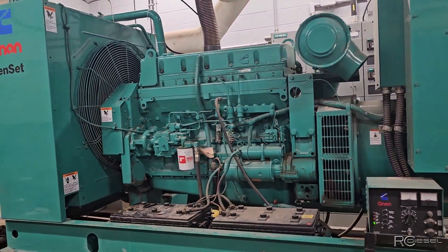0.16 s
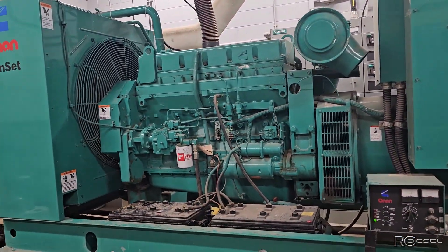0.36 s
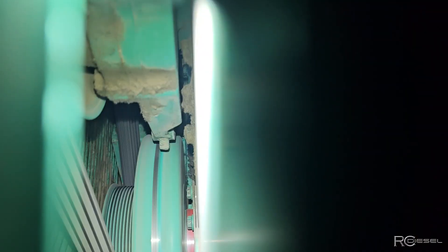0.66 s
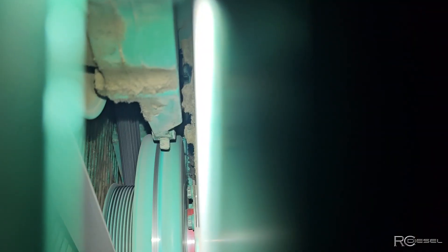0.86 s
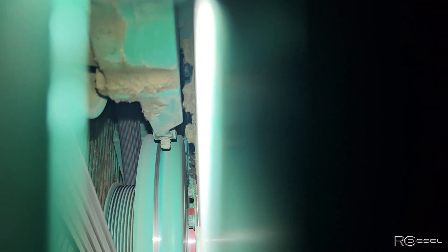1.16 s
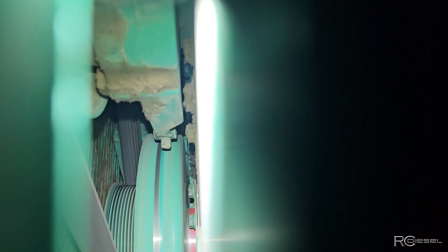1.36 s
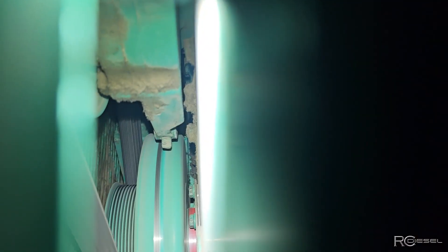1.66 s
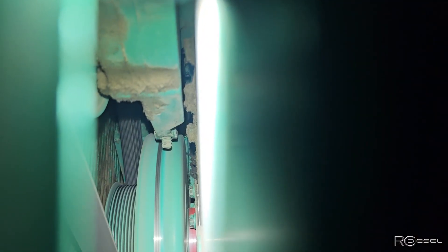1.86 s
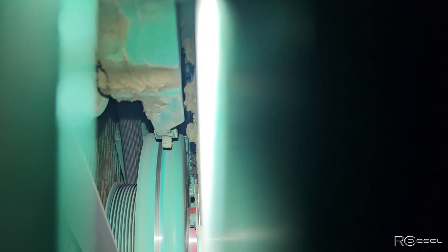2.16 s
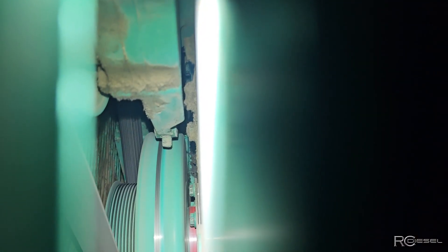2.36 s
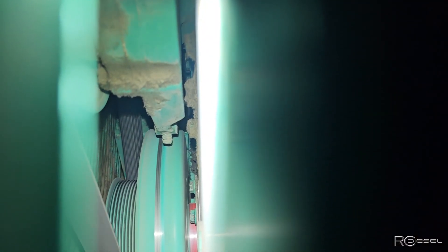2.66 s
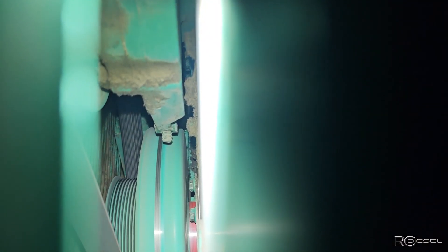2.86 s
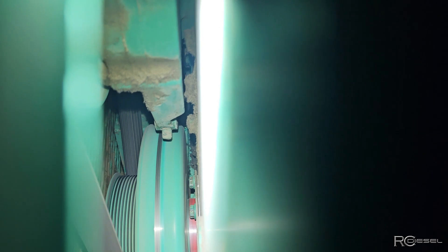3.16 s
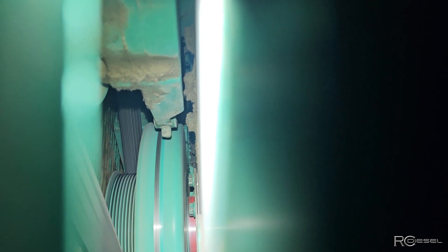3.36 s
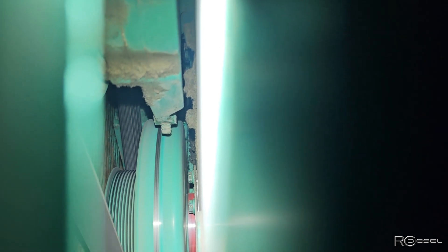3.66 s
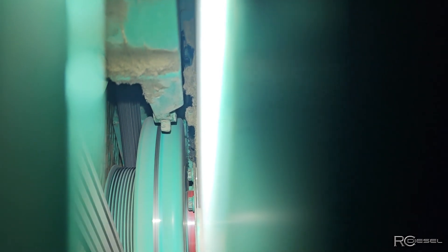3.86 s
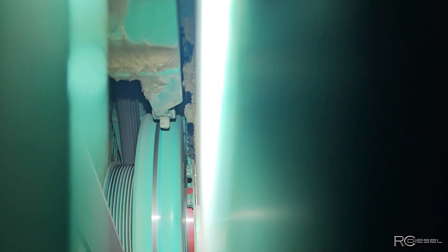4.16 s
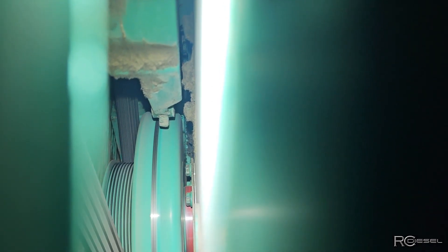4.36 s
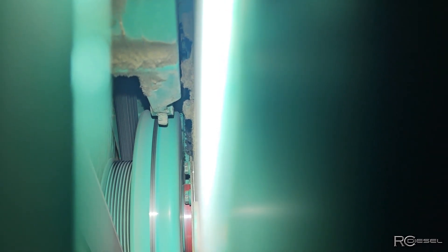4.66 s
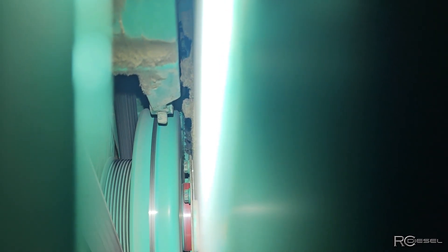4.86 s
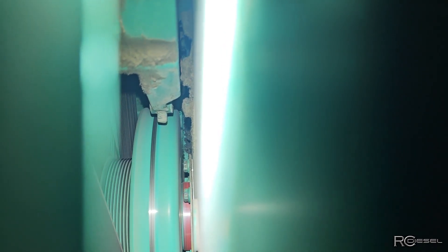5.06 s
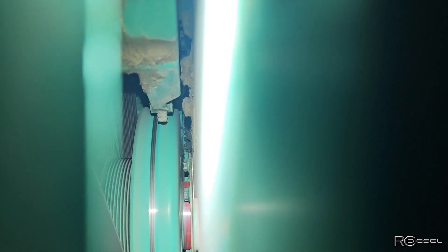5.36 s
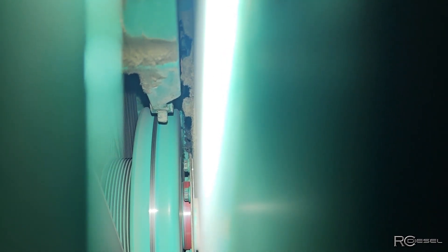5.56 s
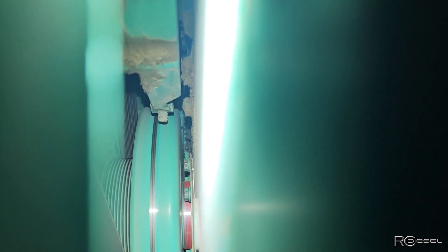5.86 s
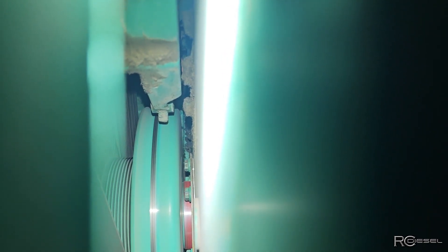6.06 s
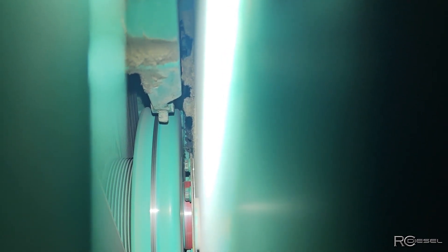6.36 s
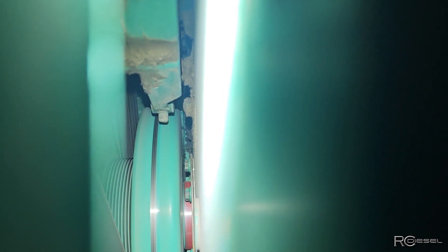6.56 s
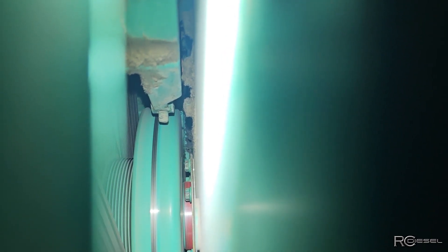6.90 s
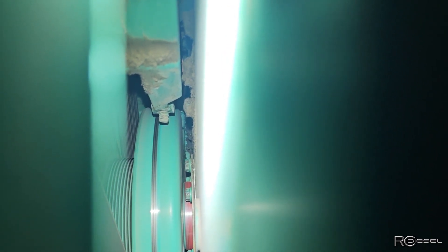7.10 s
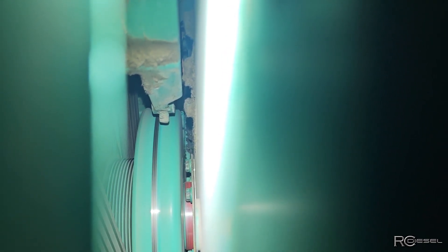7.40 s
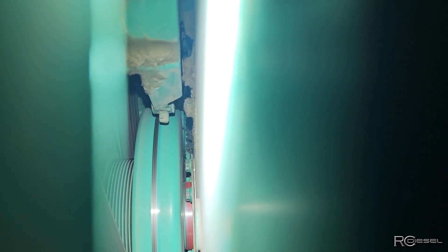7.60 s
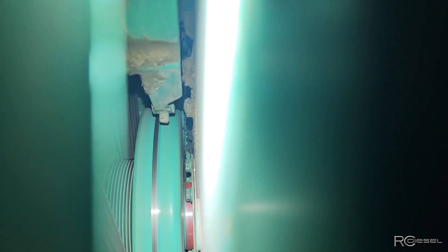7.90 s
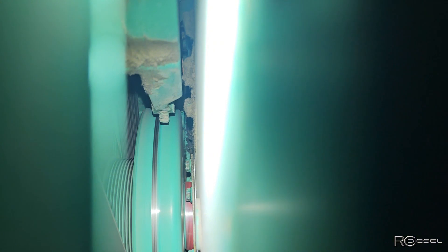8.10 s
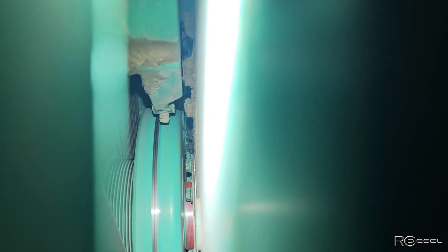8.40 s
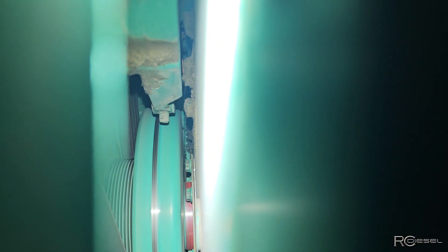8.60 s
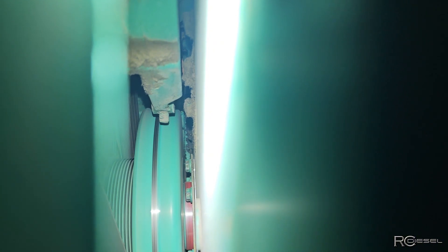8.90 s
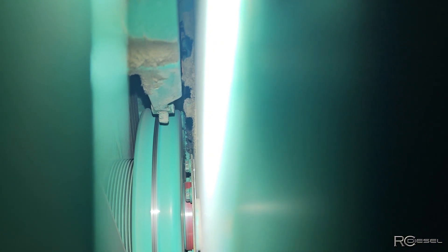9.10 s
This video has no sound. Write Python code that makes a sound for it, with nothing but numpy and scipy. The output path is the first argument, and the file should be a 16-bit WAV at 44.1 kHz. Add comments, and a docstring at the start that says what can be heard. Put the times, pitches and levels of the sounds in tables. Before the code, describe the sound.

Short distant diesel engine drone dips out, then abruptly a strong low fan-blade hum with steady windy roar and hiss, faint knocking beneath.

```python
"""A six-cylinder diesel generator runs at a steady speed in a workshop, first heard from across the room:
steady engine tones lead, over a wash of firing knocks. That view fades out; after a short silence
the microphone is right beside the radiator fan. Its blades give a strong hum with fluttering overtones,
shaped noise makes the rushing air, and engine tones and ringing knocks drone and clatter underneath."""
import sys
import numpy as np
from scipy import signal
from scipy.fft import rfft, irfft
from scipy.io import wavfile
from scipy.ndimage import uniform_filter1d

SR = 44100
rng = np.random.default_rng(int(sys.argv[2]) if len(sys.argv) > 2 else 0)


def waveform_to_disk(signal):
    """Save audio, clipped to [-1, 1], as 16-bit WAV at the path in sys.argv[1]."""
    frames = np.transpose(np.atleast_2d(signal))
    scaled = np.clip(frames, -1, 1) * 32767
    samples = np.round(scaled).astype(np.int16)
    wavfile.write(sys.argv[1], SR, samples)


N = 407484
T, HZ = np.arange(N) / SR, np.fft.rfftfreq(N, 1 / SR)

CYCLE_HZ, BLADE_HZ = 15.0, 179.52  # full four-stroke cycles and passing fan blades per second
FAR_DB, FADE_START_S, FADE_END_S, FADE_EXPONENT = -15.5, 0.11, 0.44, 1.03  # the view across the room
CUT_IN_S = 0.5565  # the view beside the fan is at full level from here
SECOND_DB, SECOND_DRIFT_DB = -27, 4  # second blade tone: level against the hum, rms of its chance drift
DRAUGHT_DB, DRAUGHT_FOLLOW = -42.5, 2.2  # wind: level at median airflow, dB gained per dB of hiss
BAND_EDGE_HZ = 15880

# knock strength of each cylinder in firing order, relative: (level [dB])
CYLINDER_KNOCKS = [2, 4.5, 2, 2.5, 4.5, 5.5]
# engine tones across the room, before the mix: (multiple of the four-stroke cycle, level [dB])
FAR_ENGINE_TONES = [(6, -14), (9, -6.5), (11, -13.5), (12, -6), (16, -8.5), (18, -18), (24, -10), (26, -19),
                    (34, -21.5), (36, -15.5), (52, -22), (80, -21.5), (123, -23)]
# colour of the knocks and wash in the room: (frequency [Hz], relative level [dB per Hz])
ROOM_COLOUR = [(20, -28), (60, -12), (130, -1), (220, -4.5), (330, -9), (480, -14.5), (750, -10),
               (1000, -15), (1400, -12.5), (2500, -22), (4000, -22), (6300, -23.5), (10000, -25),
               (11500, -25), (15700, -28)]
# likeness of the two ports across the room, held within -1 to 1: (frequency [Hz], likeness)
FAR_LIKENESS = [(130, 2.5), (290, 0.5), (640, 0.7), (1400, 0)]
# balance of the ports across the room: (frequency [Hz], left minus right [dB])
FAR_BALANCE = [(200, 2.4), (1200, .5), (4400, 1.8), (15000, 2.6)]

# blade hum beside the fan, before trim and dips: (time [s], level [dB])
HUM_LEVEL = [(0.56, -31.5), (0.73, -24), (1.14, -18), (1.89, -18.5), (2.03, -16), (2.42, -17), (3.58, -17),
             (3.97, -18), (4.81, -15.5), (5.39, -17), (6.82, -17), (6.99, -19.5), (7.16, -17.5),
             (7.84, -19), (9.07, -16.5), (9.24, -22)]
# brief dips of the hum: (middle [s], half length [s], depth [dB])
HUM_DIPS = [(3.75, .025, 2), (4.475, .018, 5.5), (5.44, .03, 5), (8.27, .04, 4)]
# swells of the second blade tone: (middle [s], half length [s], lift [dB])
SECOND_SWELLS = [(1.87, 0.15, 9), (4.25, 0.35, 11), (5.15, .35, 6.5)]
# third blade tone, before trim: (time [s], level [dB])
THIRD_LEVEL = [(0.56, -44.3), (0.81, -32.5), (1.06, -43), (1.31, -28), (1.94, -28), (2.57, -38.5),
               (2.7, -27), (2.95, -34.5), (3.96, -27.5), (4.59, -33), (4.84, -28.5), (5.97, -43),
               (6.22, -33), (6.85, -32), (7.23, -46), (7.35, -30.5), (8.74, -33), (9.24, -34.5)]
# higher blade tones at median hum: (multiple of the blade rate, level [dB], lead of left [rad])
BUZZ_TONES = [(4, -36.5, 1.1), (5, -39, 2), (6, -48, 7), (7, -36, 4), (8, -42, -2), (9, -45, -1),
              (10, -41, 2), (12, -48, -1.5)]
# air stream as the microphone moves into it, before trim: (time [s], roar level [dB], hiss level [dB])
AIR_LEVELS = [(0.56, -26.5, -28.5), (0.6, -24, -28), (0.68, -30, -30.3), (0.8, -27, -30),
              (0.92, -27.5, -26.3), (1.2, -23.5, -23.2), (1.5, -25, -24.5), (1.68, -22.5, -23),
              (2.0, -25, -23), (2.8, -23.0, -23), (3.6, -24.5, -22), (4.2, -22.0, -21.6), (4.8, -23.5, -22),
              (5.6, -20.5, -22), (6.7, -21, -21.5), (7.0, -19.5, -22), (8.4, -18.5, -21), (9.24, -21, -21)]
# colour of the low air roar: (frequency [Hz], relative level [dB per Hz])
ROAR_COLOUR = [(15, -40), (50, -17), (110, -7.5), (165, 3), (200, 0), (245, -4.5), (300, -4), (430, -7.5),
               (520, -2.5), (680, -2), (980, -4), (1280, -0.5), (1800, -10), (4000, -23)]
# colour of the high air hiss: (frequency [Hz], relative level [dB per Hz])
HISS_COLOUR = [(300, -16), (1200, -4), (2100, -1.5), (3200, 1.5), (5000, 0), (5850, -3.5), (6400, 3),
               (7600, 0.5), (8500, -3), (9700, -6), (10150, -10), (11300, -1), (13000, -4), (15700, -5)]
# colour of the wind on the microphone: (frequency [Hz], relative level [dB per Hz])
DRAUGHT_COLOUR = [(12, -35), (30, -14), (60, -3), (90, 2.0), (140, -5), (400, -52), (1500, -90)]
# engine tones beside the fan at median airflow: (multiple of the four-stroke cycle, level [dB])
NEAR_ENGINE_TONES = [(4, -67), (6, -55), (9, -41), (11, -42), (14, -53), (16, -49.5), (18, -50.5),
                     (26, -44.5), (40, -42.5), (52, -42.5), (58, -63), (64, -54), (70, -37), (75, -48),
                     (78, -52), (80, -54), (92, -54)]
# colour of the engine clatter: (frequency [Hz], relative level [dB per Hz])
CLATTER_COLOUR = [(100, -45), (400, -38), (650, -11), (1200, 2), (1700, 3), (2250, 3), (3000, -1.5),
                  (7000, -16.5), (15000, -39)]
# peaks and dips of guard and shroud: (frequency [Hz], width [Hz], lift left [dB], lift right [dB])
SHROUD_PEAKS = [(670, 71, 0.8, 1), (1180, 140, 3, 0), (1950, 79, -4.3, 6), (2254, 240, 3, 3.5),
                (2530, 90, -4.5, 0.5), (2736, 46, -4, 5), (3440, 220, -0.5, 0), (4010, 380, 0.5, 4.5),
                (5540, 140, -8, 4.5), (6800, 460, 1, -6), (7240, 280, 0, 3), (11600, 160, 2, 0),
                (13400, 570, 3, -8), (14300, 730, 1.5, 4.5), (15600, 500, 5.5, -6)]
# likeness of the two ports beside the fan: (frequency [Hz], likeness)
NEAR_LIKENESS = [(40, .87), (180, .82), (270, .42), (430, .3), (530, .7), (780, .48), (1000, .65),
                 (1350, .71), (1700, .48), (2300, .22), (6000, .06), (12000, .01)]
# phase between the ports beside the fan: (frequency [Hz], lead of left [rad])
NEAR_PHASE = [(290, .05), (380, -.4), (520, .65), (650, .9), (850, 2), (1100, 3.1), (1450, 3.35),
              (2000, 5.3), (2600, 7), (3200, 9.5)]
# balance of the ports beside the fan: (frequency [Hz], left minus right [dB])
NEAR_BALANCE = [(180, 0), (600, 1.5), (1300, -0.3), (1800, 2.5), (2400, -1.5), (3600, -2), (5200, 2),
                (6500, -4), (8000, 0), (9500, 5), (15000, 1.5)]


def gain_of(db):
    """Decibels to amplitude."""
    return 10 ** (np.asarray(db) / 20)


def evened(x):
    """Scales to rms 1, over both ports together."""
    return x / np.sqrt(np.mean(x ** 2) + 1e-20)


def read(points, hz):
    """Reads a table on a log-frequency axis."""
    f, value = np.transpose(points)
    return np.interp(np.log(hz + 1), np.log(f), value)


def curves(rows):
    """Each column of a time table, sample by sample."""
    s, *columns = np.transpose(rows)
    return [np.interp(T, s, column) for column in columns]


def bumps(rows):
    """Smooth passing rises, in dB."""
    return sum(db * np.exp(-((T - s) / half) ** 2) for s, half, db in rows)


def wander(rate_hz, top_hz=60):
    """Slow chance of rms 1: noise that thins out above the rate and faster still above the top."""
    thinning = np.sqrt(1 + (HZ / rate_hz) ** 2) * (1 + (HZ / top_hz) ** 2)
    return evened(irfft(rfft(rng.standard_normal(N)) / thinning, N))


def spin(hz):
    """Steady rotation from a random starting angle."""
    return np.exp(2j * np.pi * (hz * T + rng.random()))


def ports(pair, colour, likeness_table, balance, lead=0):
    """Colours two signals and blends them into what the two microphone ports pick up."""
    a, b = rfft(pair)
    likeness = np.clip(read(likeness_table, HZ), -1, 1)
    shared = likeness * a
    private = np.sqrt(1 - likeness ** 2) * b
    right = (shared + private) * np.exp(-1j * lead)
    half = gain_of(read(balance, HZ) / 2)
    heard = np.array([a * half, right / half]) * gain_of(read(colour, HZ))
    return evened(irfft(heard, N))


def far_drone():
    """The engine at constant speed: steady tones on multiples of its cycle, alike in both ports."""
    return np.sqrt(2) * sum(gain_of(db) * spin(k * CYCLE_HZ).real for k, db in FAR_ENGINE_TONES)


def knocks(ring_s, fresh, uneven_db, size=1400):
    """Every firing rattles the block: each cylinder has its own ring, plus a part that is new each time."""
    cylinders = len(CYLINDER_KNOCKS)
    count = int(N / SR * CYCLE_HZ * cylinders) + 1
    own = rng.standard_normal((cylinders, 2, size))
    decay = np.exp(-np.arange(size) / SR / ring_s)
    out = np.zeros((2, N + 2 * size))
    for k in range(count):
        cylinder = k % cylinders
        at = round(k * SR / CYCLE_HZ / cylinders)
        blow = gain_of(CYLINDER_KNOCKS[cylinder] + uneven_db * rng.standard_normal())
        rattle = own[cylinder] + fresh * rng.standard_normal((2, size))
        out[:, at:at + size] += blow * decay * rattle
    return evened(out[:, :N])


def room_wash():
    """The walls smear the knocks: a long ring and equally strong steady noise share the room's colour."""
    smeared = knocks(ring_s=0.028, fresh=0.64, uneven_db=1.0) + rng.standard_normal((2, N))
    return ports(smeared, ROOM_COLOUR, FAR_LIKENESS, FAR_BALANCE)


def far_view():
    """Across the room: drone and wash, fading to silence."""
    fade = np.clip((FADE_END_S - T) / (FADE_END_S - FADE_START_S), 0, 1) ** FADE_EXPONENT
    mix = gain_of(-2.5) * far_drone() + gain_of(-2.5) * room_wash()
    return gain_of(FAR_DB) * fade * mix


def tone(turns, hz, lead):
    """A rotation heard as a tone at the two ports beside the fan, with their balance and phase."""
    half = gain_of(read(NEAR_BALANCE, hz) / 2) * np.exp(0.5j * lead)
    return np.sqrt(2) * np.array([turns * half, turns / half]).real


def blade_tone(angle, order, flutter, lead):
    """One multiple of the blade rate; turbulent inflow makes its size and phase flutter."""
    gusts = (wander(rate_hz=7.9) + 1j * wander(rate_hz=2.2)) / np.sqrt(2)
    swing = (1 + flutter * gusts) / np.sqrt(1 + flutter ** 2)
    return tone(swing * np.exp(1j * order * angle) * spin(0), order * BLADE_HZ, lead)


def fan_hum(angle):
    """Blades pass the shroud: a strong hum, two surging overtones and a thin buzz above."""
    (hum_db,), (third_db,) = curves(HUM_LEVEL), curves(THIRD_LEVEL)
    drift_db = SECOND_DRIFT_DB * wander(rate_hz=2.5, top_hz=5.4)
    second_db = hum_db + SECOND_DB + bumps(SECOND_SWELLS) + drift_db
    hum = gain_of(hum_db + 0.06 - bumps(HUM_DIPS)) * blade_tone(angle, order=1, flutter=0.079, lead=0.079)
    second = gain_of(second_db) * blade_tone(angle, order=2, flutter=0.58, lead=-0.81)
    third = gain_of(third_db + 1.0) * blade_tone(angle, order=3, flutter=0.46, lead=0.73)
    buzz = sum(gain_of(db) * blade_tone(angle, order=k, flutter=1.3, lead=lead)
               for k, db, lead in BUZZ_TONES)
    return hum + second + third + gain_of(hum_db - np.median(hum_db)) * buzz


def beside_fan(pair, colour):
    """Sound from inside the ringing shroud, with a phase lead between the ports for each frequency."""
    lift_db = sum(np.outer([left, right], np.exp(-2 * ((HZ - hz) / width) ** 2))
                  for hz, width, left, right in SHROUD_PEAKS)
    heard = ports(pair, colour, NEAR_LIKENESS, NEAR_BALANCE, read(NEAR_PHASE, HZ))
    return evened(irfft(rfft(heard) * gain_of(lift_db), N))


def rushing_air(angle, colour, chop, gust_db, grain_db):
    """Turbulent air: it gusts, breaks into brief eddies and is chopped a little by each blade."""
    eddies = evened(uniform_filter1d(rng.standard_normal(N), size=130))
    turbulence = gain_of(gust_db * wander(rate_hz=3.4) + grain_db * eddies)
    pressure = (1 + chop * np.cos(angle)) * turbulence
    return beside_fan(rng.standard_normal((2, N)) * pressure, colour)


def buffeting(flow_db):
    """Lumps of moving air push on the microphone, much harder as the airflow grows."""
    lumps = rng.standard_normal((2, N)) * gain_of(4.2 * wander(rate_hz=6.5, top_hz=20))
    push = ports(lumps, DRAUGHT_COLOUR, NEAR_LIKENESS, NEAR_BALANCE)
    return gain_of(DRAUGHT_DB + DRAUGHT_FOLLOW * flow_db) * push


def near_drone():
    """Steady engine tones on multiples of the cycle, with the port phase of each frequency."""
    out = np.zeros((2, N))
    for k, db in NEAR_ENGINE_TONES:
        hz = k * CYCLE_HZ
        out += gain_of(db) * tone(spin(hz), hz, read(NEAR_PHASE, hz))
    return out


def clatter():
    """Short-ringing knocks heard through the shroud, their level wavering by chance."""
    level_db = -30.0 + 1.7 * wander(rate_hz=7.9, top_hz=22)
    rattle = knocks(ring_s=0.014, fresh=0.82, uneven_db=2.5)
    return gain_of(level_db) * beside_fan(rattle, CLATTER_COLOUR)


def near_view():
    """Right beside the fan: hum and air on top, engine drone and clatter below, swelling with the hiss."""
    roar_db, hiss_db = curves(AIR_LEVELS)
    flow_db = hiss_db - np.median(hiss_db)
    angle = 2 * np.pi * BLADE_HZ * T + 0.14 * wander(rate_hz=0.66)  # the belt creeps slightly
    roar = gain_of(roar_db - 0.03) * rushing_air(angle, ROAR_COLOUR, chop=0.01, gust_db=1.47, grain_db=0.6)
    hiss = gain_of(hiss_db + 0.1) * rushing_air(angle, HISS_COLOUR, chop=0.02, gust_db=0.48, grain_db=0.78)
    engine = gain_of(flow_db) * (near_drone() + clatter())
    cut_in = gain_of(np.clip(1500 * (T - CUT_IN_S), -200, 0))  # rises by 1500 dB per second
    return cut_in * (fan_hum(angle) + roar + hiss + buffeting(flow_db) + engine)


def scene():
    """The two listening places, one after the other."""
    return far_view() + near_view()


def record(dry):
    """The recorder's band limit: a steep low-pass."""
    low_pass = signal.firwin(1023, BAND_EDGE_HZ, window=("kaiser", 9), fs=SR)
    return signal.oaconvolve(dry, low_pass[None], "same")


dry = scene()
out = record(dry)
waveform_to_disk(out)
```